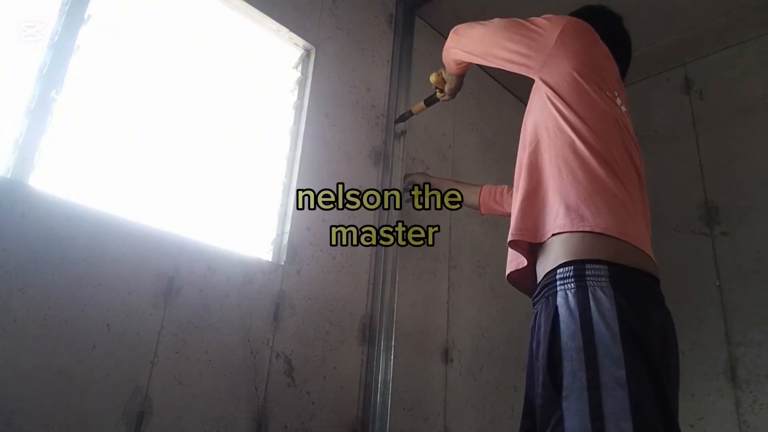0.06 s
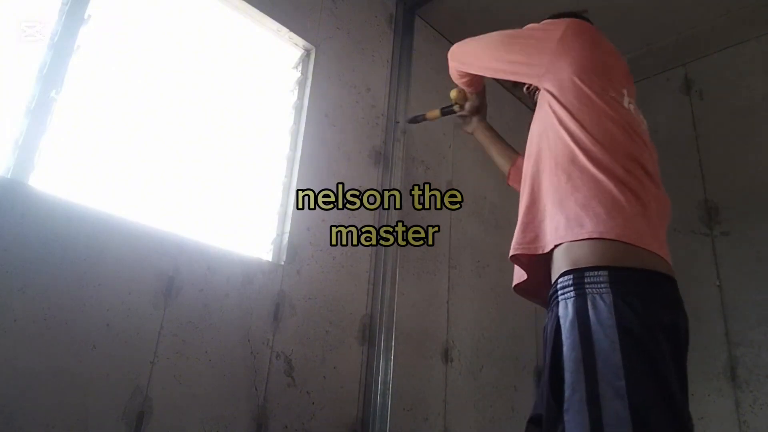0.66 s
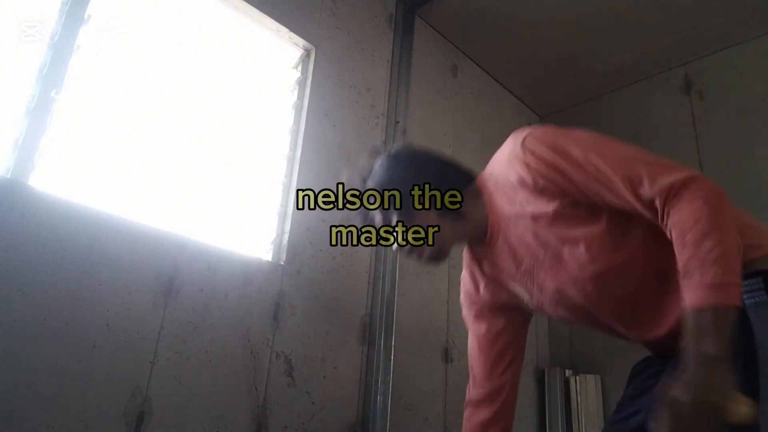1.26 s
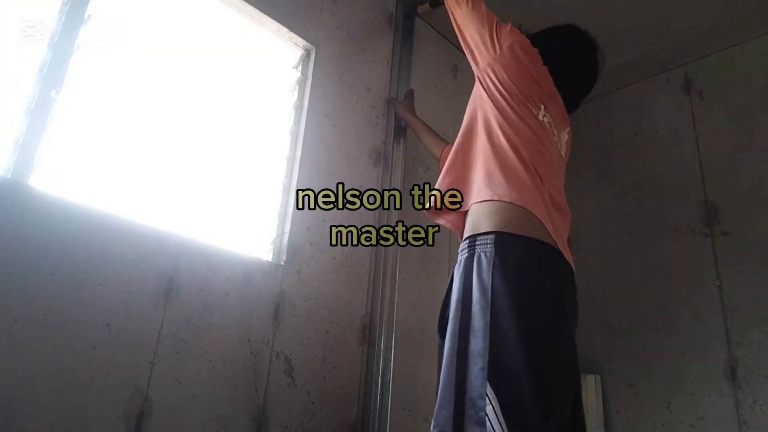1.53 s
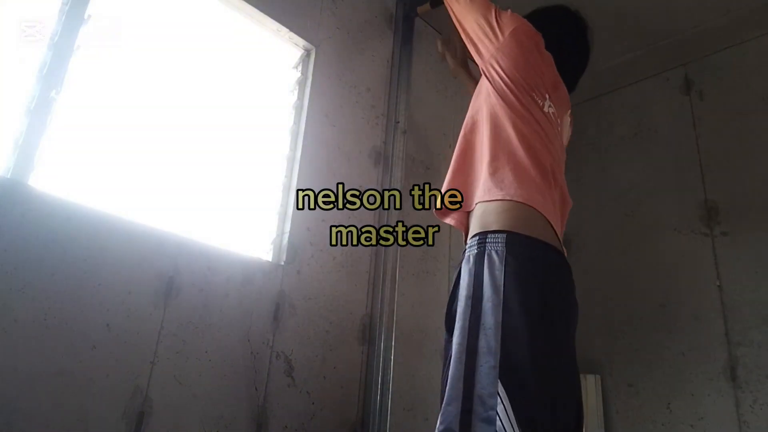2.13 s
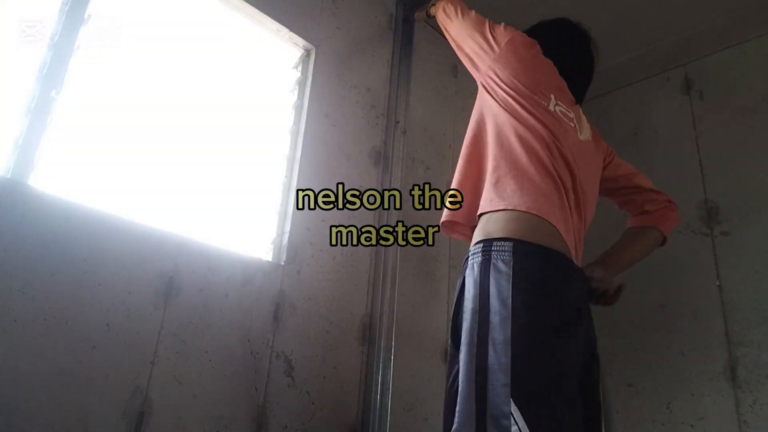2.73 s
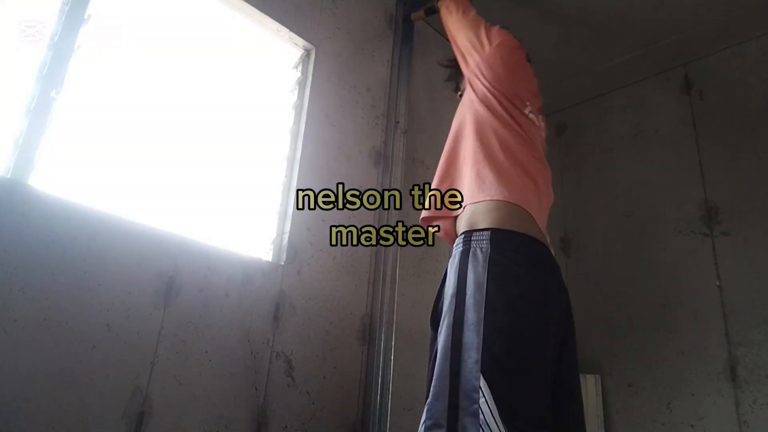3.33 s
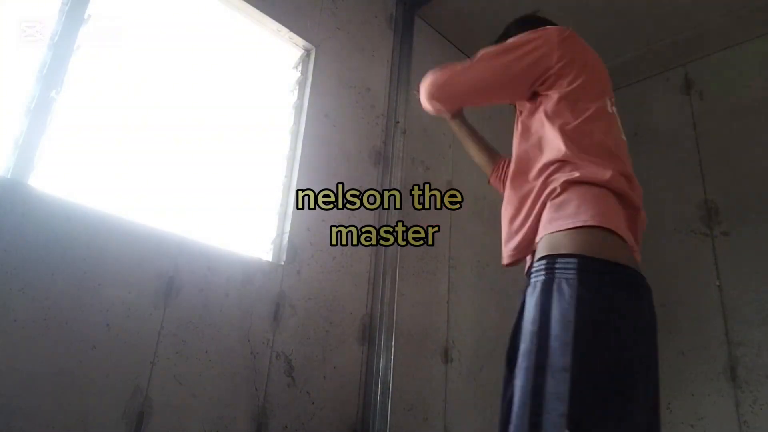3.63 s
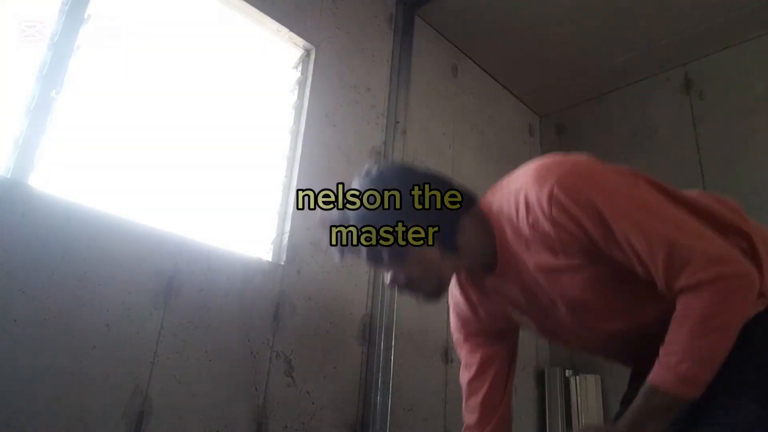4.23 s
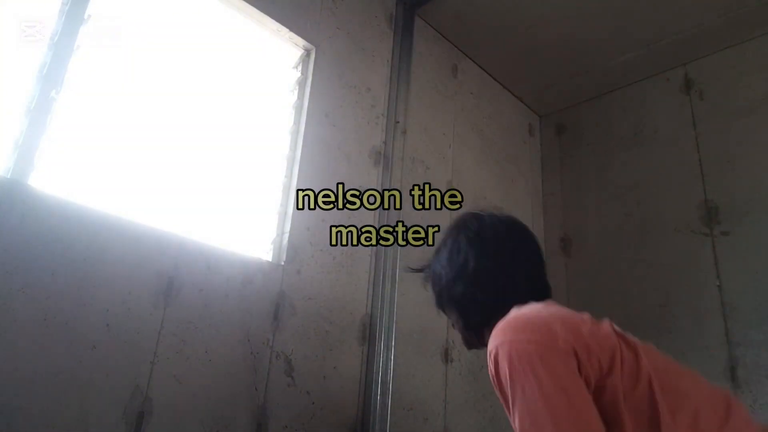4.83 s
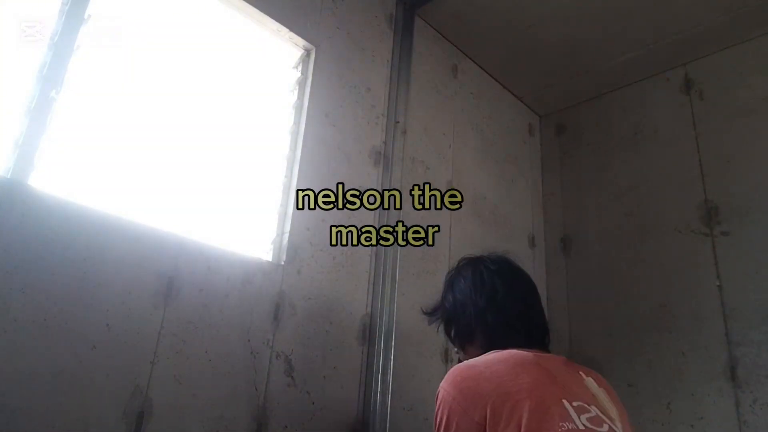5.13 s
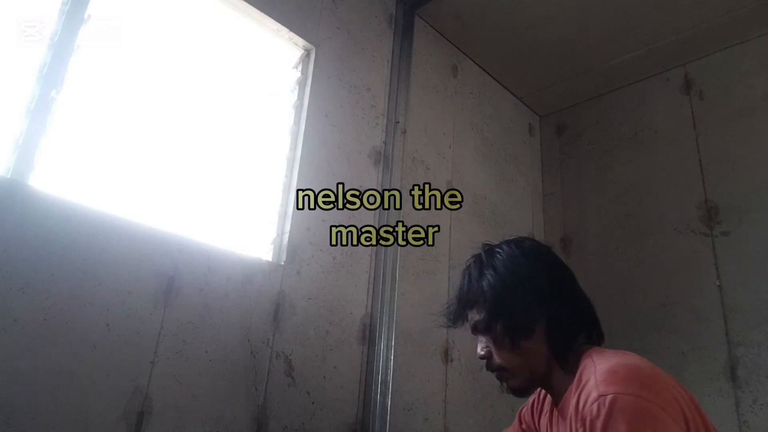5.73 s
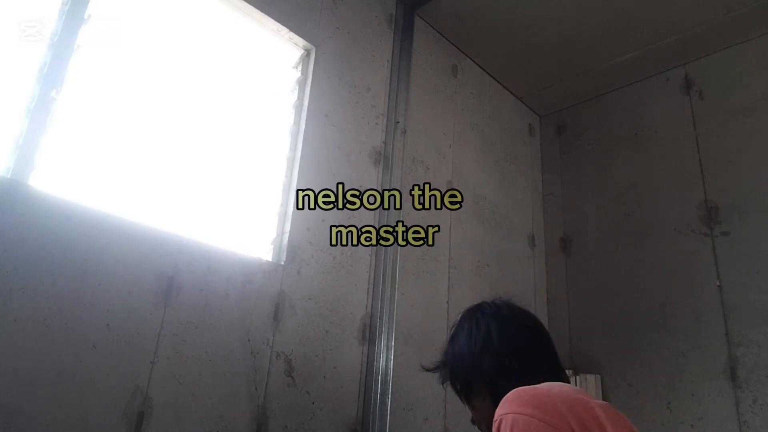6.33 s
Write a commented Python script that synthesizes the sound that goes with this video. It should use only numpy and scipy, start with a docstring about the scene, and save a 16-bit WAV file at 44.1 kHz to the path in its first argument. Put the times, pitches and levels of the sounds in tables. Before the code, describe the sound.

Thin steel framing track is worked in a bare, echoing concrete room, with a faint low murmur of air from a window. Light tool clicks lead to a violent, crunching snap at 0.5 seconds, which overloads the microphone and leaves a low boom. Clicks and small pings follow around 1.1 seconds, then a bright, ringing metal clatter and scrape at 1.8. Between 2.2 and 3.3 seconds the track scrapes in short catching strokes with brief squeaks. A second loud, distorted snap hits at 3.3 seconds. From 3.7 to 4.9 come soft footfalls, rustling clothes and scattered tool clicks. A stand knocks hollowly twice just after 5.1 seconds, right before the third booming snap at 5.3. Lighter knocks and clicks continue as the stand rocks, with a soft step near 5.9, dying away by about 6.3 seconds.

```python
"""A bare concrete room: a worker trims and fits thin steel framing track overhead.
The steel gives way in three sharp snaps that overload the microphone and set the room booming.
Around them the tool clicks, loose pieces ping, and the track scrapes and squeaks by stick-slip.
The worker's stand knocks hollowly as the weight shifts; feet land softly and clothes rustle.
Air murmurs through a window opening."""
import sys
import numpy as np
from scipy import signal
from scipy.fft import rfft, irfft
from scipy.io import wavfile
from scipy.ndimage import uniform_filter1d

SR = 44100
rng = np.random.default_rng(int(sys.argv[2]) if len(sys.argv) > 2 else 0)


def file_out(sig):
    """Save sig as 16-bit WAV at sys.argv[1]."""
    # one column per channel
    cols = np.atleast_2d(sig).T
    # limit, then scale
    lim = np.clip(cols, -1, 1)
    pcm = np.round(lim * 32767).astype(np.int16)
    wavfile.write(sys.argv[1], SR, pcm)


N = 280474
TIME_S = np.arange(N) / SR

# worker's movements: start_s, length_s, level_db
MOVEMENTS = [(0, 0.037, -46), (0.287, 0.077, -46.5), (1.59, 0.37, -64.5), (3.778, 0.18, -48),
             (4.29, 0.19, -54), (4.615, 0.14, -43), (4.827, 0.13, -49.5), (5.144, 0.7, -57.5)]
# rustle spectrum: freq_hz, gain_db
CLOTH_SPECTRUM = [(60, 2), (200, 6), (500, 1), (1100, 3.5), (1700, 3.5), (4000, 1), (7000, -10.5),
                  (10000, -17), (16000, -17.5)]
# outside air spectrum: freq_hz, gain_db
AIR_SPECTRUM = [(20, 14.5), (45, 12), (90, 5.5), (250, 3.5), (450, -0.5), (650, -2), (900, -9.5),
                (1200, -5), (2000, -16.5), (5000, -26), (9000, -22), (15000, -36)]
# tool touching track; the row at 1.753 s is the scraping edge biting in: start_s, level_db, tilt_db_per_oct,
# decay_s, direct_db
TOOL_CLICKS = [(0.124, -13.5, -0.5, 0.0044, -9), (.242, -8.5, -4, 0.0033, -12),
               (0.49, -9.5, -5.5, 0.022, -8), (.978, -13, 4, .004, -8), (0.996, -5.5, 0.5, 0.0027, -4),
               (1.087, 2.5, 4.5, 0.0046, -0.5), (1.585, -9.5, -2.5, 0.003, -8),
               (1.701, -12.5, -1.5, 0.0046, -21), (1.753, 16.5, 5.5, 0.096, -1),
               (3.147, -20, 1, 0.011, -17), (3.721, -13, -7, 0.0033, -21), (3.781, -10.5, 13, .006, -12),
               (3.801, -11.5, -6.5, 0.0028, -1), (3.950, 4, 2, 0.00072, -5), (4.041, -7.5, 0, 0.004, -1),
               (4.12, -8.5, -1.5, 0.0085, -5.5), (4.317, -10, 0, 0.0018, 1), (4.42, -19, 6, 0.0011, -6),
               (4.452, -13.5, -6, 0.0011, -1.5), (4.484, -9, -7.5, 0.0012, -5), (4.743, -5.5, 1, 0.012, -8),
               (5.656, 0.5, 3.5, 0.0016, -3), (5.739, -15.5, 1, 0.0035, 2), (5.805, -7, -12, 0.0038, -3.5)]
# track clatter spectrum: freq_hz, gain_db
STEEL_SPECTRUM = [(60, -2.5), (250, -9.5), (500, -13.5), (1000, -0.5), (1600, -1.5), (2800, 3),
                  (5200, -1.5), (7000, -0.5), (10000, -4), (16000, -16.5)]
# track modes: pitch_hz, level_db, t60_s
STEEL_MODES = [(861, -13, .4), (1480, -4, .35), (3295, -8, .7), (1186, -6, .03), (2020, -3, .02),
               (2292, -6, .02), (2605, 2, .03), (3130, 2, .025), (3700, -4, .02), (3945, -6, .03),
               (4380, -4, .02), (4845, -8, .03), (5157, -8, .02), (6300, -10, .015), (6700, -5, .012),
               (7580, -9, .015)]
# edges catching: start_s, length_s, first_hz, last_hz, level_db
EDGE_SQUEAKS = [(0.198, 0.056, 1260, 1350, -52), (2.469, .04, 876, 1053, -25),
                (2.518, 0.065, 1097, 1026, -30.5), (3.25, 0.056, 2436, 2620, -28),
                (4.412, 0.036, 4900, 5020, -53)]
# loose pieces ringing: start_s, pitch_hz, level_db, t60_s
LOOSE_PINGS = [(.245, 1200, -10, 0.02), (1.087, 1340, -10, .03), (1.586, 1170, -9.5, 0.023),
               (2.042, 1060, -7, 0.032), (2.04, 2020, -10.5, 0.007), (1.09, 18000, -6, 0.024),
               (3.9, 10600, -31, 0.012), (3.2, 12000, -27, 0.03)]
# steel giving way: start_s, level_db, tilt_db_per_oct, decay_s
STEEL_SNAPS = [(.508, 33.5, 1, 0.026), (3.318, 30, 1, 0.027), (5.276, 28.5, 0.8, 0.027)]
# steel sliding on steel and concrete:
# start_s, rise_s, sag_s, hiss_db, hiss_half_width_oct, groan_db, max_t60_s, direct_db
SCRAPE_STROKES = [(1.257, 0.12, 0.0088, -51.5, 1.6, -45.5, 0.045, 7.5),
                  (1.747, 0.014, 0.024, -11, .9, -40.5, 0.27, -15),
                  (1.785, 0.0095, 0.093, -18, .95, -53, .25, -5),
                  (2.241, 0.038, 0.064, -45.5, 2, -54.5, .05, -11),
                  (2.318, 0.037, 0.036, -29, 1.7, -62, 0.12, -15),
                  (2.398, 0.019, 0.061, -35.5, 1.4, -28, 0.2, -3),
                  (2.456, 0.03, 0.098, -26, 0.85, -25, 0.5, -12),
                  (2.807, 0.077, .07, -52, 1.6, -54.5, .05, -16),
                  (3.141, 0.015, 0.086, -36.5, 2.6, -56.5, .1, -3.5),
                  (3.246, 0.012, 0.058, -29.5, 1.7, -52.5, .1, -2.5),
                  (4.811, 0.084, 0.018, -39, .9, -40.5, .05, -10)]
# stand rocking: start_s, level_db, decay_s, rattle_db
STAND_KNOCKS = [(1.529, -14.5, 0.016, -35), (3.301, -1, 0.023, 0), (5.112, 5, 0.014, -7),
                (5.218, 9, 0.011, -14), (5.445, -4.5, 0.012, -46), (5.565, -3, 0.0037, -16),
                (5.686, -2, 0.0085, -16), (5.804, -3.5, 0.011, -5.5), (5.915, -2.5, 0.0073, -12.5)]
# feet landing: start_s, level_db, decay_s
FOOTFALLS = [(3.775, -10, 0.031), (3.893, -7, 0.011), (3.955, -9.5, 0.017), (4.271, -5.5, 0.0021),
             (4.39, -7, 0.019), (5.899, -3.5, 0.019)]
# room decay: freq_hz, t60_s
ROOM_DECAY = [(60, 0.8), (400, 0.55), (1200, 0.57), (3000, 0.47), (7000, 0.41), (14000, 0.24)]
# microphone response: freq_hz, gain_db
MIC_RESPONSE = [(20, -2.5), (100, 0), (7900, -5.5), (8500, -16.5), (10000, -11), (12000, -2), (16000, -2.5)]
# overload blast spectrum: freq_hz, gain_db
BLAST_SPECTRUM = [(20, 5.5), (60, 6), (150, 13.5), (350, 10), (1000, 6.5), (1800, -4.5), (4000, -5.5),
                  (16000, -35)]

BAND_EDGES_HZ = np.geomspace(40, 18000, 11)
# dense wall reflections, one row of noise per band
WALL_NOISE = np.array([
    signal.sosfilt(signal.butter(3, band_hz, "bandpass", fs=SR, output="sos"),
                   rng.standard_normal(3 * SR))
    for band_hz in zip(BAND_EDGES_HZ, BAND_EDGES_HZ[1:])])


def undb(db):
    """Decibels to gain."""
    return 10 ** (np.asarray(db) / 20)


def unit(x):
    """Scale to unit energy."""
    return x / np.sqrt(np.sum(x ** 2) + 1e-18)


def add(out, start_s, x):
    """Mix x in at start_s."""
    i = max(int(start_s * SR), 0)
    out[i:i + len(x)] += x[:len(out) - i]


def padded(x):
    """Zero-pad to 1 s."""
    return np.pad(x, (0, SR - len(x)))


def through(x, response):
    """Pass x through an impulse response."""
    return signal.fftconvolve(x, response)[:len(x)]


def lowpass(x, order, cutoff_hz):
    """Butterworth low-pass."""
    return signal.sosfilt(signal.butter(order, cutoff_hz, fs=SR, output="sos"), x)


def at_hz(points, hz):
    """Interpolate (freq_hz, value) points over log frequency."""
    freq_hz, value = np.transpose(points)
    return np.interp(np.log(hz), np.log(freq_hz), value)


def min_phase(db_at_hz, size=4096):
    """Minimum-phase impulse response of a gain curve."""
    hz = np.maximum(np.arange(size // 2 + 1), 1) * SR / size
    cepstrum = irfft(np.log(undb(db_at_hz(hz))))
    cepstrum[1:size // 2] *= 2
    cepstrum[size // 2 + 1:] = 0
    return irfft(np.exp(rfft(cepstrum)))


def colour(spectrum):
    """Impulse response of a spectrum table."""
    return min_phase(lambda hz: at_hz(spectrum, hz))


def hump(centre_hz, half_width_oct):
    """Broad resonance, 6 dB down at the half-width."""
    return unit(min_phase(lambda hz: -20 * np.log10(1 + (np.log2(hz / centre_hz) / half_width_oct) ** 2)))


def whiten(x):
    """Flatten the spectrum, keep the timing: a run of tiny contacts has no pitch."""
    spectrum = rfft(x)
    return unit(irfft(spectrum / (np.abs(spectrum) + 1e-18), len(x)))


def slips(samples, rate_per_s, spread_db):
    """Random pulses of uneven size, unit rms."""
    pulses = (rng.random(samples) < rate_per_s / SR) * rng.standard_normal(samples)
    sizes = undb(spread_db * rng.standard_normal(samples))
    return unit(pulses * sizes) * np.sqrt(samples)


def contact(decay_s, tilt_db_per_oct=0, impact=1.0):
    """One blow and its dying chatter; harder contact tilts it brighter."""
    t = TIME_S[:SR // 6]
    chatter = unit(slips(len(t), rate_per_s=9000, spread_db=2.3) * np.exp(-t / decay_s))
    chatter[0] += impact
    burst = whiten(chatter) * np.exp(-(t / (4 * decay_s)) ** 2)
    tilt = min_phase(lambda hz: tilt_db_per_oct * np.log2(np.maximum(hz, 500)))
    return unit(through(burst, tilt))


def room(x, direct_db, early_db=2, early_s=0.045):
    """Bare concrete: direct sound, strong early reflections, a dense tail whose treble dies first."""
    t = TIME_S[:SR - SR // 4]
    spot = rng.integers(2 * SR)  # each spot has its own echo pattern
    t60_s = at_hz(ROOM_DECAY, np.sqrt(BAND_EDGES_HZ[1:] * BAND_EDGES_HZ[:-1]))
    tail = np.sum(WALL_NOISE[:, spot:spot + len(t)] * undb(-60 * t / t60_s[:, None]), axis=0)
    early_boost = 1 + undb(early_db) * np.exp(-t / early_s)
    return through(x, unit(tail * early_boost)) + undb(direct_db) * x


def rustle(attack_s=0.021, release_s=0.064, still_db=-76.5):
    """Cloth and grit crackle: each movement swells, holds and dies away."""
    effort = undb(still_db)
    for start_s, length_s, level_db in MOVEMENTS:
        before_s = np.maximum(start_s - TIME_S, 0)
        after_s = np.maximum(TIME_S - start_s - length_s, 0)
        effort = effort + undb(level_db) * np.exp(-before_s / attack_s - after_s / release_s)
    grains = slips(N, rate_per_s=2500, spread_db=4.5)
    return room(through(grains * effort, unit(colour(CLOTH_SPECTRUM))), direct_db=-6)


def outside_air(level_db=-52):
    """Low, distant murmur through the window opening."""
    return undb(level_db) * through(rng.standard_normal(N), unit(colour(AIR_SPECTRUM)))


def mode(pitch_hz, t60_s):
    """Decaying sine, unit energy."""
    t = TIME_S[:SR]
    return unit(np.sin(2 * np.pi * pitch_hz * t) * undb(-60 * t / t60_s))


def track(force, ring_db, max_t60_s=1):
    """Thin steel: dense, short clatter plus modes; a grip caps their ring time."""
    modes = unit(sum(undb(db) * mode(hz, min(t60_s, max_t60_s)) for hz, db, t60_s in STEEL_MODES))
    clatter = through(force, unit(colour(STEEL_SPECTRUM)))
    return clatter + undb(ring_db) * through(force, modes)


def clicks():
    """Tool contacts on the track, and one hard bite of a scraping edge; near ones stand clear of the room."""
    force = np.zeros(N)
    for start_s, level_db, tilt_db_per_oct, decay_s, direct_db in TOOL_CLICKS:
        tap = padded(contact(decay_s, tilt_db_per_oct, impact=0.058))
        add(force, start_s, undb(level_db) * room(tap, direct_db))
    return track(force, ring_db=-9)


def squeaks(waver_rms=0.029, overtone_db=-11):
    """An edge catches at a nearly regular rate: a gliding, wavering tone."""
    out = np.zeros(N)
    for start_s, length_s, first_hz, last_hz, level_db in EDGE_SQUEAKS:
        samples = int(length_s * SR)
        wobble = unit(uniform_filter1d(rng.standard_normal(samples), size=100)) * np.sqrt(samples)
        pitch_hz = np.linspace(first_hz, last_hz, samples) * (1 + waver_rms * wobble)
        phase = 2 * np.pi * np.cumsum(pitch_hz) / SR
        tone = np.sin(phase) + undb(overtone_db) * np.sin(2 * phase)
        add(out, start_s, undb(level_db) * np.hanning(samples) * tone)
    return room(out, direct_db=6)


def pings(clatter_db=-5):
    """Loose pieces chatter and ring on one short note."""
    out = np.zeros(N)
    for start_s, pitch_hz, level_db, t60_s in LOOSE_PINGS:
        blow = padded(contact(decay_s=0.0038))
        note = through(blow, mode(pitch_hz, t60_s))
        clatter = through(blow, hump(pitch_hz, half_width_oct=0.2))
        add(out, start_s, undb(level_db) * (note + undb(clatter_db) * clatter))
    return room(out, direct_db=-68)


def snaps():
    """Firmly gripped steel gives way with a short, violent crunch."""
    force = np.zeros(N)
    for start_s, level_db, tilt_db_per_oct, decay_s in STEEL_SNAPS:
        crunch = padded(contact(decay_s, tilt_db_per_oct, impact=0.3))
        add(force, start_s, undb(level_db) * room(crunch, direct_db=-3.5, early_db=12.5, early_s=0.042))
    return track(force, ring_db=-10, max_t60_s=0.053)


def boom(relative_db=-29, cutoff_hz=220, t60_s=0.98):
    """Each snap shakes the walls; the room's bass dies slowly."""
    out, t = np.zeros(N), TIME_S[:2 * SR]
    for start_s, snap_db, _, _ in STEEL_SNAPS:
        tail = lowpass(rng.standard_normal(len(t)), 2, cutoff_hz) * undb(-60 * t / t60_s)
        add(out, start_s, undb(snap_db + relative_db) * unit(tail))
    return out


def scrapes(hiss_hz=3420, groan_hz=705, low_cut_hz=260, end_pressure=0.6):
    """Stick-slip strokes swell, sag and stop; the edge hisses, the channel groans, the track rings."""
    out, t = np.zeros(N), TIME_S[:SR // 3]
    # the narrow sheet radiates little bass
    low_cut = signal.butter(2, low_cut_hz, "highpass", fs=SR, output="sos")
    for start_s, rise_s, sag_s, hiss_db, half_width_oct, groan_db, max_t60_s, direct_db in SCRAPE_STROKES:
        pressure = np.interp(t, [0, rise_s, rise_s + sag_s], [0, 1, end_pressure], right=0)
        friction = whiten(slips(len(t), rate_per_s=3000, spread_db=4) * pressure)
        stroke = friction * pressure * np.linalg.norm(pressure)
        hiss = undb(hiss_db) * hump(hiss_hz, half_width_oct)
        groan = undb(groan_db) * hump(groan_hz, half_width_oct=0.98)
        body = signal.sosfilt(low_cut, hiss + groan)
        force = room(padded(through(stroke, body)), direct_db)
        add(out, start_s, track(force, ring_db=-4.5, max_t60_s=max_t60_s))
    return out


def thud(body_hz, decay_s, rattle_db, cutoff_hz=1250, rattle_hz=2470):
    """A blow on a dull hollow body, with a rattle above it."""
    blow = contact(decay_s, impact=0.42)
    resonance = through(blow, hump(body_hz, half_width_oct=1.05))
    body = unit(lowpass(resonance, 4, cutoff_hz))
    rattle = unit(through(blow, hump(rattle_hz, half_width_oct=0.35)))
    return room(padded(body + undb(rattle_db) * rattle), direct_db=-12.5, early_db=15, early_s=0.1)


def knocks(body_hz=599):
    """The stand rocks on the floor."""
    out = np.zeros(N)
    for start_s, level_db, decay_s, rattle_db in STAND_KNOCKS:
        add(out, start_s, undb(level_db) * thud(body_hz, decay_s, rattle_db))
    return out


def steps(body_hz=172, grit_db=-16.5):
    """Feet land low and soft on a little grit."""
    out = np.zeros(N)
    for start_s, level_db, decay_s in FOOTFALLS:
        add(out, start_s, undb(level_db) * thud(body_hz, decay_s, grit_db))
    return out


def scene():
    """All sources at the microphone, mono."""
    impacts = snaps() + boom() + clicks() + pings() + knocks() + steps()
    return (impacts + scrapes() + squeaks() + rustle() + outside_air())[None]


def record(dry, limit_rms=0.14, recovery_s=0.0041, duck=0.61, clip_at=0.61, top_hz=16000):
    """Heavy pressure chokes the microphone: it loses sensitivity and gives a low, rough blast."""
    pressure = dry[0]
    swing = lowpass(pressure, 4, cutoff_hz=1500)  # only lows swing the diaphragm far enough
    recovery = np.exp(-TIME_S[:SR // 8] / recovery_s)
    swing_rms = np.sqrt(np.abs(through(swing ** 2, recovery / recovery.sum())))
    choke = np.tanh(5 * np.maximum(swing_rms / limit_rms - 0.85, 0)) ** 2
    blast = choke * through(np.tanh(3 * pressure), colour(BLAST_SPECTRUM))
    ducked = (np.clip(pressure, -clip_at, clip_at) + blast) / (1 + duck * choke)
    coloured = through(ducked, colour(MIC_RESPONSE))
    saturated = 1.05 * np.tanh(coloured / 1.05)
    band_limit = signal.ellip(10, 0.2, 70, top_hz, fs=SR, output="sos")
    return signal.sosfilt(band_limit, saturated)[None]


dry = scene()
out = record(dry)
file_out(out)
```